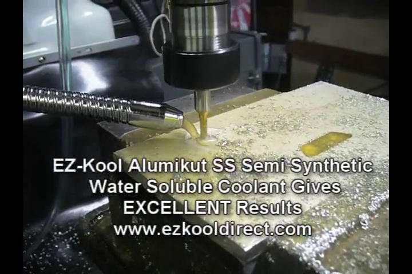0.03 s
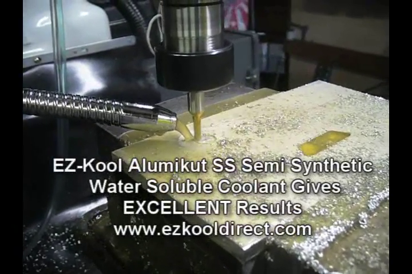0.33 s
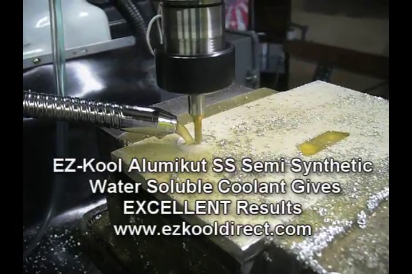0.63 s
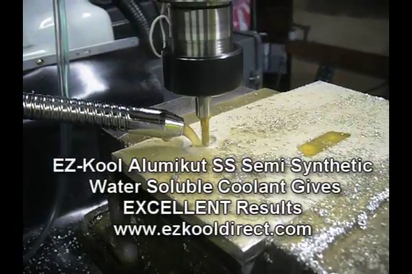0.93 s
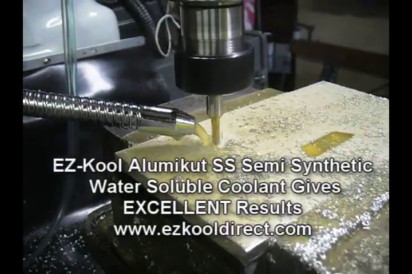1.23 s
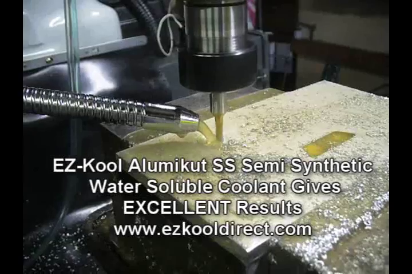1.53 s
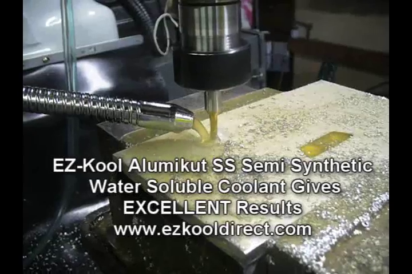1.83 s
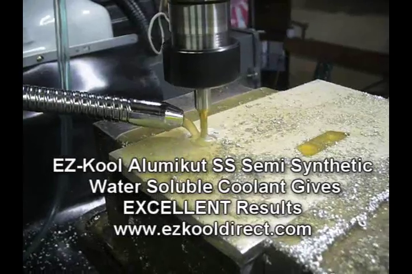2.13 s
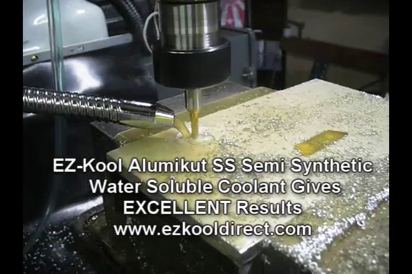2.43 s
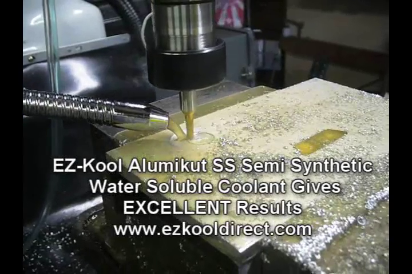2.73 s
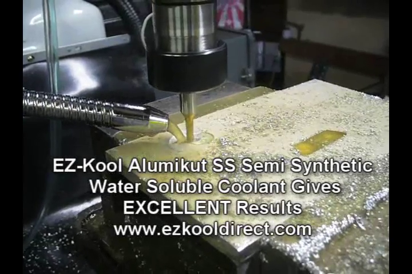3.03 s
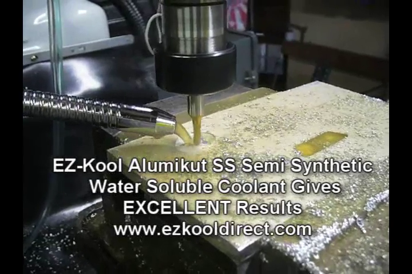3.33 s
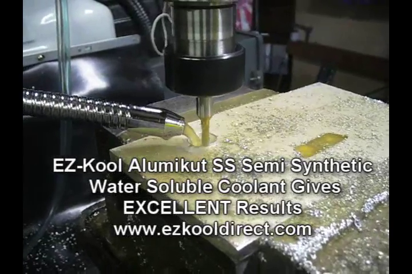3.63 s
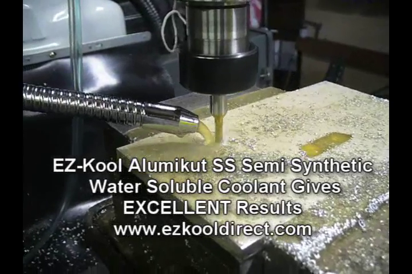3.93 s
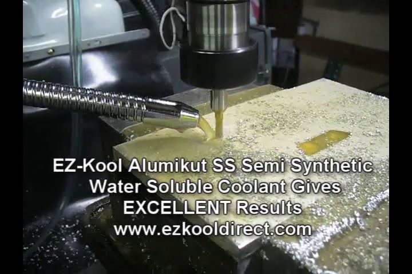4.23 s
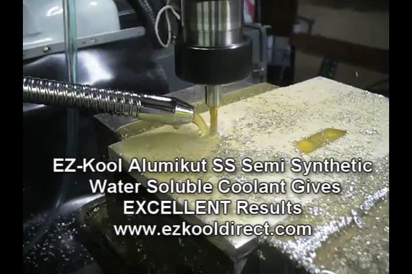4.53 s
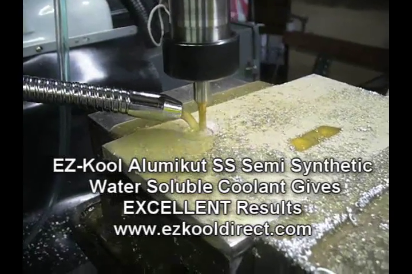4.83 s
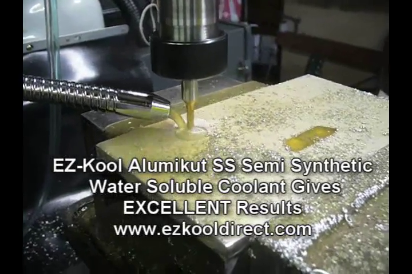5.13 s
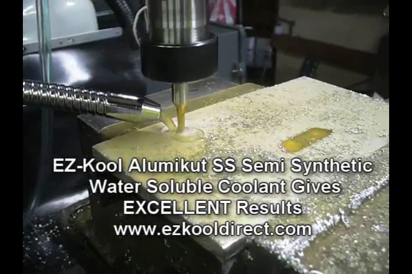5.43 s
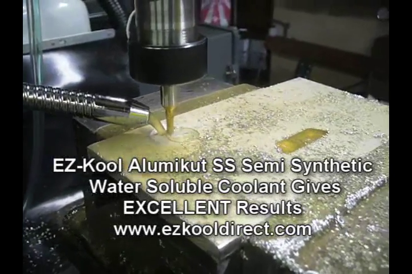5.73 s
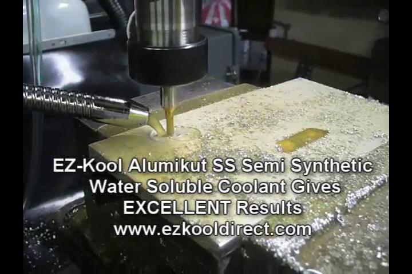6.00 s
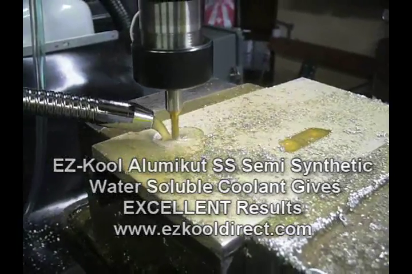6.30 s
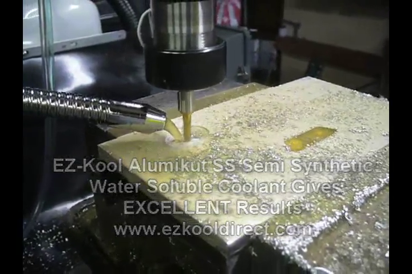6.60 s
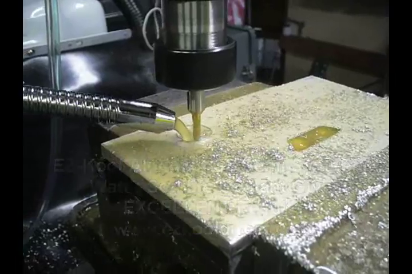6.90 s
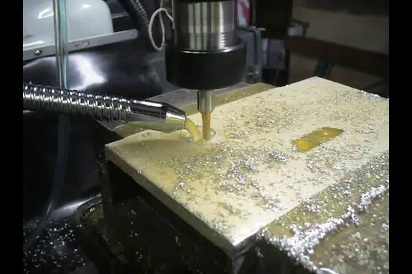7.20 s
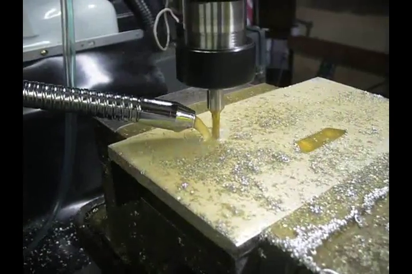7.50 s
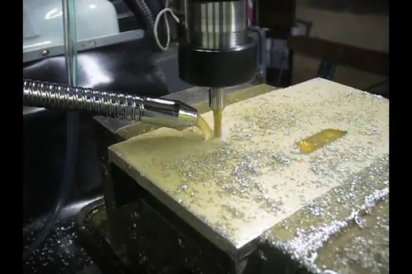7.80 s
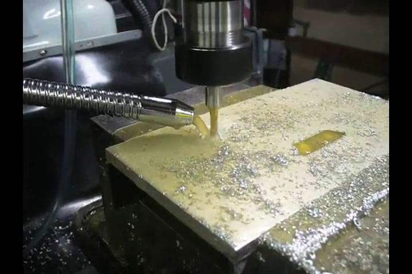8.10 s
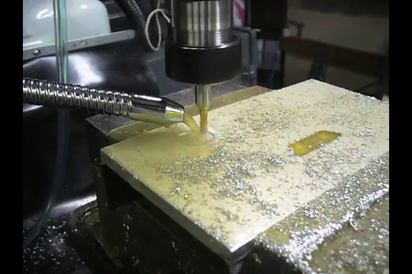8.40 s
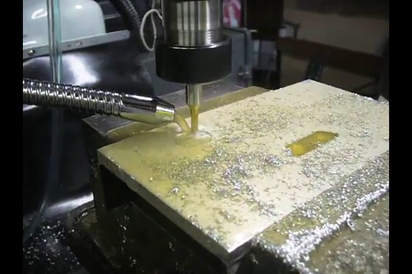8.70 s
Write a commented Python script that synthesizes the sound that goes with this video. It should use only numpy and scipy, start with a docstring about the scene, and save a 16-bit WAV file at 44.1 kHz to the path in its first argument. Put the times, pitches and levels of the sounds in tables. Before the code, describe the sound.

A milling machine cuts a metal plate in a workshop, heard from close by. A loud, mid-pitched tone swells and dips every second or so over a steady rush of bearings, motor hum and thin whines. The cutter rings and rasps lightly against the metal at intervals. Underneath, coolant patters faintly and small chips tick now and then. The machine runs without a break.

```python
"""A loud, pulsing tone over a steady rush: a CNC mill cuts a widening spiral in a metal plate, close by.
The spindle turns about 5000 times a minute and radiates harmonics of that rate, which swell and fade
with each lap, over a slightly slower motor and steady whines. Friction in bearings and cutter makes
noise that pulses with the turning, coloured by the resonances of frame and tool. Coolant patters,
chips tick on the table, and on two stretches of each lap an edge rasps against the wall."""
import sys
import numpy as np
from scipy import signal
from scipy.fft import rfft, irfft
from scipy.io import wavfile

SR = 44100
rng = np.random.default_rng(int(sys.argv[2]) if len(sys.argv) > 2 else 0)


def store_wav(level_fs):
    """Save 16-bit WAV to argv[1]."""
    pcm = np.round(np.clip(np.atleast_2d(level_fs), -1, 1) * 32767)
    wavfile.write(sys.argv[1], SR, pcm.T.astype(np.int16))


N = 385875
TIME = np.arange(N) / SR
BIN_HZ = np.fft.rfftfreq(N, 1 / SR)


def gain_of(db):
    """Decibels as an amplitude ratio."""
    return 10 ** (np.asarray(db) / 20)


def unit_rms(x):
    """Normalisation to an rms of one."""
    return x / np.sqrt(np.mean(x ** 2) + 1e-20)


def coloured(x, gain):
    """Linear filtering by a gain per frequency, scaled to unit rms."""
    return unit_rms(irfft(rfft(x) * gain, N))


def resonance(hz, width_hz):
    """The Lorentzian curve of one damped mode, with a peak of one."""
    return 1 / (1 + (2 * (BIN_HZ - hz) / width_hz) ** 2)


def bell(x, centre, width):
    """A Gaussian curve that falls to 1/e at one width from its centre."""
    return np.exp(-((x - centre) / width) ** 2)


def noise_band(hz, width_hz):
    """Band-limited noise with a Gaussian spectrum."""
    return coloured(rng.standard_normal(N), bell(BIN_HZ, hz, width_hz))


def drift(hz):
    """Slow random fluctuation: noise low-passed at about hz."""
    return noise_band(0, hz)


def tone(cycles, db, waver, waver_hz):
    """Multipath fading: a sinusoid wavers in amplitude and phase as its paths to the listener change."""
    knots_s = np.arange(0, N / SR + 1, .5 / waver_hz)
    real, imag = rng.standard_normal((2, len(knots_s)))
    phasor = np.interp(TIME, knots_s, (1 + waver * (real + 1j * imag)) / np.sqrt(1 + waver ** 2))
    angle = 2 * np.pi * (cycles + rng.random())
    return np.sqrt(2) * gain_of(db) * (phasor.real * np.cos(angle) + phasor.imag * np.sin(angle))


def spiral_laps(start_s=.7, lap_s=2.12, growth_s_per_lap=.745):
    """Laps since start_s: at constant feed, lap time grows with the radius of the spiral."""
    return (np.sqrt(lap_s ** 2 + 2 * growth_s_per_lap * (TIME - start_s)) - lap_s) / growth_s_per_lap


def lap_level_db(lap, mean_db, once_db, once_crest_lap, twice_db, twice_crest_lap):
    """Periodic modulation: a level follows the direction of the cut, swelling once and twice a lap."""
    once = once_db * np.cos(2 * np.pi * (lap - once_crest_lap))
    twice = twice_db * np.cos(4 * np.pi * (lap - twice_crest_lap))
    return mean_db + once + twice


def surge_db(order):
    """Transient modulation: the harmonic at order times the turning rate briefly surges or dips."""
    # swells and dips of single harmonics: order, centre_s, half_length_s, change_db
    surges = [(2, .12, .15, 3.5), (2, .55, 0.18, -6.5), (2, 4.7, 0.6, 2.5), (2, 6.17, 0.11, -11),
              (2, 7.25, 0.11, -11), (2, 8.9, .1, 4), (4, .6, .2, 3), (4, 1.05, .12, -11),
              (4, 2.1, 0.2, -8.5), (4, 2.93, .15, 3.5), (4, 4, .15, 3), (4, 6.1, .25, 2),
              (4, 6.67, .12, -14), (4, 7.25, .15, 11), (4, 8.35, .15, 5), (5, .17, .15, 3.5),
              (5, 1.1, .12, -5), (5, 1.72, .17, 4), (5, 2.8, .08, -9), (5, 2.85, .13, 5.5),
              (5, 3.4, .3, -4.5), (5, 4.5, .08, -5), (5, 4.65, .2, 6.5), (5, 5.72, .07, -10),
              (5, 6.65, 0.16, -9), (5, 7.52, 0.088, -10), (5, 8.05, .2, 4.5), (5, 8.65, .15, 3),
              (6, .55, .08, -9), (6, 2.9, .1, -9), (6, 3.32, 0.14, 4.5), (6, 4.2, .12, -12),
              (6, 4.7, .15, 2), (6, 5.75, .15, 6), (6, 6.15, 0.11, -12.5), (6, 7, .09, 5.5),
              (6, 7.5, .1, 3), (7, .18, .07, -11), (7, .37, 0.077, 2.5), (7, 1.15, .15, 5),
              (7, 2.05, .16, 5), (7, 2.74, 0.087, 7), (7, 4.1, .35, 7), (7, 4.84, 0.072, 7),
              (7, 5.24, 0.083, 3.5), (7, 5.88, .13, 5.5), (7, 7.38, .13, 8), (7, 8.45, .1, 5.5),
              (8, 1.4, .1, -2), (8, 4.42, .1, -2.5), (8, 5.38, 0.057, -6), (8, 5.57, 0.054, -6.5),
              (8, 5.72, .1, 1), (8, 5.7, .1, 1.5), (8, 6.75, 0.15, 3), (8, 7.04, 0.047, -8.5),
              (8, 7.18, 0.061, -9.5), (8, 7.34, .05, -4.5), (8, 7.6, .2, 0), (8, 8.35, .2, 3.5),
              (10, 1.7, .05, -5), (10, 3.9, .22, 3), (10, 4.4, .08, -6), (10, 5.38, 0.095, -16),
              (10, 5.68, .05, -7), (10, 6.65, .15, 2), (10, 7.04, 0.065, -15), (10, 7.37, 0.11, -12),
              (10, 7.53, .1, 3), (10, 7.95, 0.22, -4), (10, 8.62, 0.056, 4.5), (24, 6.4, .3, 2.5),
              (26, 4.35, .15, 5), (27, .85, .18, 2.5), (27, 3.8, .2, 0), (27, 7.55, .2, 1),
              (28, 3.45, .25, 4), (28, 6.8, 0.18, 4), (34, 1.88, .15, 0.5), (34, 5.7, .1, 0.5),
              (34, 8.3, .2, 0.5)]
    return sum(db * bell(TIME, centre_s, half_s) for k, centre_s, half_s, db in surges if k == order)


def teeth(turns, lap, order=8, start_db=-26, fade_db_per_s=.18):
    """Forced vibration: the edges shake the frame along one axis; the tone dips with the force across it."""
    force_along_axis = np.hypot(np.sin(2 * np.pi * lap), .05) ** .87
    db = start_db - fade_db_per_s * TIME + surge_db(order)
    return force_along_axis * tone(order * turns + .04 * drift(1.2), db, waver=.039, waver_hz=6)


def spindle(turns, lap, slip_hz=.23, in_step_s=1.04):
    """Harmonic series at the turning rate; the strong members swell with the lap and beat with the motor."""
    # strong harmonics: order, relative_db, once_db, once_crest_lap, twice_db, twice_crest_lap,
    # beat_depth, sway_cycles
    strong_harmonics = [(4, -44.5, 2, 0.93, 3.5, 0.39, 0.1, .15), (6, -41, 1.5, .81, 2, 0.1, 0.3, .22),
                        (7, -37.5, 4.5, 0.74, 2, .15, 0.4, .22),
                        (10, -33.5, 0.5, .1, 0.5, 0.27, 0.05, 0.033),
                        (24, -49, 4.5, .02, 2.5, .02, 0.03, .1), (26, -49, 4, .38, 1.5, .38, 0.02, 0.16),
                        (27, -39.5, 2.5, 0.091, 2, 0.4, 0.03, 0.05),
                        (28, -51, 4.5, .1, 3.5, 0.093, 0.04, .1)]
    # weak harmonics: order, level_db
    weak_harmonics = [(9, -42), (11, -46.5), (12, -47), (13, -44.5), (14, -43), (16, -48.5), (17, -45.5),
                      (18, -45), (19, -47), (20, -48), (22, -49), (29, -52), (30, -54.5), (32, -58),
                      (33, -56.5), (34, -53)]
    strong = 0
    for order, *swell, beat_depth, sway_cycles in strong_harmonics:
        beat = abs(1 + beat_depth * np.exp(2j * np.pi * order * slip_hz * (TIME - in_step_s)))
        db = lap_level_db(lap, *swell) + surge_db(order) + .6 * drift(3.9)
        strong += beat * tone(order * turns + sway_cycles * drift(1.29), db, waver=.11, waver_hz=8.1)
    weak = sum(tone(order * turns, db, waver=.55, waver_hz=1.5) for order, db in weak_harmonics)
    return gain_of(.14) * strong + weak


def drives(lap, motor_hz=83.42, hum_hz=120):
    """Line spectra of motor, drives and mains: load strengthens the upper harmonics and the whistles."""
    # motor harmonics: order, relative_db
    motor_harmonics = [(1, -51), (2, -40.5), (3, -46), (5, -38), (12, -44.5), (13, -46), (18, -47),
                       (33, -50), (34, -41.5), (36, -52)]
    # effect of load on the top harmonic: mean_db, once_db, once_crest_lap, twice_db, twice_crest_lap
    load_swell = (-.8, 2, .42, 1.5, .46)
    # whines of axis drives and bearings: pitch_hz, level_db
    whine_lines = [(300, -52.5), (365, -48.5), (392, -46.5), (431, -42), (476, -44.5), (515, -50.5),
                   (707, -49.5), (982, -47.5), (1059, -49.5), (1323, -48), (1373, -45), (1532, -50),
                   (2197, -49), (2315, -54.5), (2862, -52.5), (2919, -58.5), (2973, -60.5)]
    # thin whistles of the motor's drive: pitch_hz, relative_db
    whistle_lines = [(4998, -71), (5025, -78), (5080, -79.5), (5137, -74), (5155, -75), (5165, -65.5),
                     (5238, -76), (5248, -74.5), (5655, -78), (5739, -70.5), (5802, -83), (5823, -79.5),
                     (5990, -82)]
    load_db = lap_level_db(lap, *load_swell)
    top_order = motor_harmonics[-1][0]
    motor = 0
    for order, relative_db in motor_harmonics:
        loaded_db = relative_db + load_db * order / top_order + surge_db(order)
        motor += tone(order * motor_hz * TIME, loaded_db, waver=.092, waver_hz=1.5)
    whines = sum(tone(hz * TIME, db, waver=.24 + hz / 30000, waver_hz=1 + hz / 1500)
                 for hz, db in whine_lines)
    whistles = sum(tone(hz * TIME, db + .6 * load_db, waver=.2, waver_hz=4) for hz, db in whistle_lines)
    hum = tone(hum_hz * TIME, db=-45.5, waver=.2, waver_hz=3.5)
    return gain_of(-1) * motor + whines + gain_of(.5) * whistles + hum


def pulsing_noise(turns, depths):
    """Amplitude modulation of white noise at the turning rate and its multiples, one depth for each."""
    pulse = sum(depth * np.cos(2 * np.pi * order * turns) for order, depth in enumerate(depths, 1))
    return rng.standard_normal(N) * (1 + pulse)


def rush(turns, lap, low_split_hz=330, high_split_hz=2500):
    """Source and filter: friction noise through the frame gives table rumble, bearing rush and cut rasp."""
    # spectrum of bearings, fan and coolant: frequency_hz, density_db
    spectrum = [(30, -19.5), (90, -19), (170, -4.5), (280, -3.5), (520, -0.3), (780, 0), (930, -0.5),
                (1300, 0.64), (1900, -2.5), (2100, -5.5), (2900, -13.5), (3900, -30.5), (5200, -36),
                (6700, -49.5), (7050, -64), (7400, -80)]
    # resonances of head, table and plate: centre_hz, width_hz, lift_db
    frame_modes = [(197, 96, 2.5), (315, 21, 4), (383, 13, -4), (453, 25, 2.5), (559, 40, 5),
                   (763, 50, 4.5), (896, 30, -3), (1123, 57, -5), (1254, 63, 5), (1365, 32, 4.5),
                   (1384, 20, -3.5), (1775, 120, 3.5), (1823, 24, -5), (1918, 90, 4), (2590, 92, -3),
                   (2880, 45, -2.5), (3440, 120, 6), (3720, 90, 5), (4030, 220, -2.5), (4300, 120, 1.5),
                   (4580, 130, 4.5), (4800, 300, -2.5), (5400, 120, -2), (5620, 150, 4), (5900, 110, -2.5),
                   (6100, 330, 3)]
    # swell of each band: relative_db, once_db, once_crest_lap, twice_db, twice_crest_lap
    rumble_swell = (-39.5, 0.9, 1.14, 0.1, .21)
    bearing_swell = (-27, -0.1, 1.4, 0.43, .01)
    rasp_swell = (-38.5, 0.4, 0, 0.5, .06)
    points_hz, points_db = np.transpose(spectrum)
    source_db = np.interp(np.log(BIN_HZ + 1), np.log(points_hz + 1), points_db)
    frame_db = sum(db * resonance(hz, width_hz) for hz, width_hz, db in frame_modes)
    colour = gain_of(source_db + frame_db)
    low = 1 / (1 + (BIN_HZ / low_split_hz) ** 10)  # each band's share of the power
    high = 1 / (1 + (high_split_hz / (BIN_HZ + 1)) ** 20)
    middle = (1 - low) * (1 - high)
    rumble = coloured(rng.standard_normal(N), colour * np.sqrt(low))
    bearings = coloured(pulsing_noise(turns, [.04, .06, .025]), colour * np.sqrt(middle))
    rasp = coloured(pulsing_noise(turns, [.048, .04, .04, .07]), colour * np.sqrt(high))
    flutter_db = .5 * drift(18)  # the edges bite unevenly
    return (rumble * gain_of(lap_level_db(lap, *rumble_swell))
            + bearings * gain_of(lap_level_db(lap, *bearing_swell) + 1.77)
            + rasp * gain_of(lap_level_db(lap, *rasp_swell) + 1 + flutter_db))


def tool_ring(turns, lap):
    """Driven resonance: the cutting edges keep the tool ringing in a few close modes."""
    # modes of the tool in its holder: centre_hz, width_hz, relative_db
    tool_modes = [(2255, 70, 0), (2360, 43, -6), (2458, 84, -4.5)]
    # swell of the ringing: relative_db, once_db, once_crest_lap, twice_db, twice_crest_lap
    ring_swell = (-35, 1.5, 0.5, 0.5, .1)
    response = sum(gain_of(db) * resonance(hz, width_hz) for hz, width_hz, db in tool_modes)
    ring = coloured(pulsing_noise(turns, [.1, .18]), response)
    return gain_of(lap_level_db(lap, *ring_swell) - 4.5) * ring


def splatter(drops_per_s=700, level_db=-60, centre_hz=4300, width_hz=1100):
    """Shot noise: coolant and fine swarf patter down as many small and a few larger impacts."""
    size_db = 3.5 * np.minimum(rng.exponential(1, N), 4) + drift(5)
    impacts = (rng.random(N) < drops_per_s / SR) * gain_of(size_db) * rng.choice([-1, 1], N)
    return gain_of(level_db) * coloured(impacts, bell(BIN_HZ, centre_hz, width_hz))


def chips(decay_s=.001, trim_db=-2.5):
    """Impact excitation: a larger chip strikes the metal, and its modes die away in a sharp tick."""
    # strikes on the metal: start_s, relative_peak_db
    strikes = [(.1198, -41), (0.9093, -37), (1.0021, -39), (1.095, -35.5), (2.6275, -37), (3.4077, -40),
               (4.1762, -39), (4.6709, -35), (5.0424, -37), (5.6461, -34), (6.7607, -39)]
    # modes of a struck chip: pitch_hz, relative_db
    chip_modes = [(4150, -1), (4550, -1.5), (4950, 0.5), (5500, -6.5), (6200, -10.5), (6750, -13)]
    t = np.arange(256) / SR
    out = np.zeros(N)
    for start_s, peak_db in strikes:
        detune = rng.uniform(.96, 1.04)
        ring = sum(gain_of(db) * np.sin(2 * np.pi * (hz * detune * t + rng.random()))
                   for hz, db in chip_modes)
        tick = np.exp(-t / decay_s) * ring
        start = round(start_s * SR)
        out[start:start + len(t)] += gain_of(peak_db + trim_db) * tick / abs(tick).max()
    return out


def bursts():
    """Transient band noise: dull shudders of table and frame, and brighter rasps of chips."""
    # swells of noise: centre_s, half_length_s, centre_hz, width_hz, level_db
    swells = [(.2, .1, 230, 60, -39), (1.605, .03, 4000, 900, -52), (2.56, .1, 205, 40, -34),
              (5.25, .3, 2900, 450, -42.5), (7.03, 0.036, 1340, 130, -31), (7.116, .018, 790, 150, -26.5),
              (7.126, 0.043, 205, 30, -39), (8.3, .18, 2790, 300, -38.5)]
    return sum(gain_of(db) * bell(TIME, centre_s, half_s) * noise_band(hz, width_hz)
               for centre_s, half_s, hz, width_hz, db in swells)


def scrapes(turns, lap, rise_turns=.04):
    """Periodic impact: on two stretches of each lap the longest edge rasps the wall once a turn."""
    # stretches of contact: centre_hz, width_hz, level_db, crest_lap, half_length_laps, strike_turns,
    # decay_turns, fade_db_per_s
    stretches = [(2400, 480, -37, .03, 0.15, .9, 0.3, 1), (4240, 1200, -55.5, .46, .12, .84, .2, 0.1)]
    out = np.zeros(N)
    for hz, width_hz, db, crest_lap, half_laps, strike_turns, decay_turns, fade_db_per_s in stretches:
        since_strike = (turns - strike_turns) % 1
        strike = unit_rms((1 - np.exp(-since_strike / rise_turns)) * np.exp(-since_strike / decay_turns))
        laps_from_crest = (lap - crest_lap + .5) % 1 - .5
        contact = bell(laps_from_crest, 0, half_laps)
        out += gain_of(db - fade_db_per_s * TIME) * contact * strike * noise_band(hz, width_hz)
    return out


def scene(spindle_hz=83.82, sag_hz_per_s=.025):
    """Superposition: the turning angle times harmonics and pulses; the place on the lap sets levels."""
    turns = np.cumsum(spindle_hz - sag_hz_per_s * TIME) / SR
    lap = spiral_laps()
    tones = teeth(turns, lap) + spindle(turns, lap) + drives(lap)
    noises = rush(turns, lap) + tool_ring(turns, lap) + splatter()
    transients = chips() + bursts() + scrapes(turns, lap)
    fade_in = np.clip(TIME / .004, 0, 1)
    return ((tones + noises + transients) * fade_in)[None]


def record(dry):
    """Band limiting: a low-pass filter removes the top treble, and a constant offset shifts the wave."""
    cutoff_hz, dc_offset = 7200, -.06
    low_pass = signal.firwin(401, cutoff_hz, window=("kaiser", 9), fs=SR)
    return dc_offset + signal.oaconvolve(dry, low_pass[None], "same")


dry = scene()
out = record(dry)
store_wav(out)
```